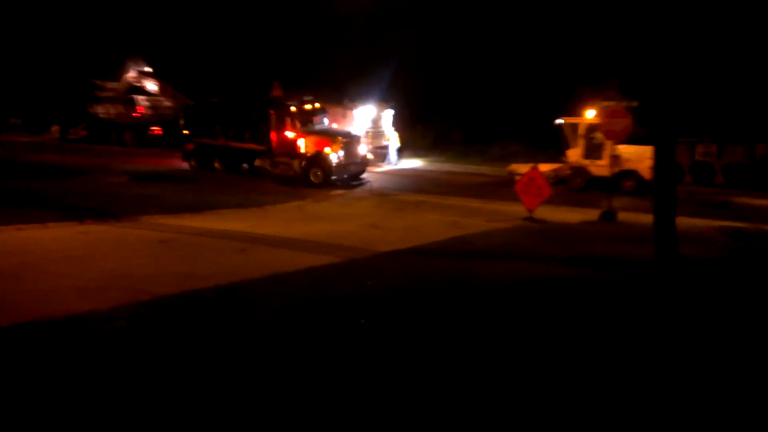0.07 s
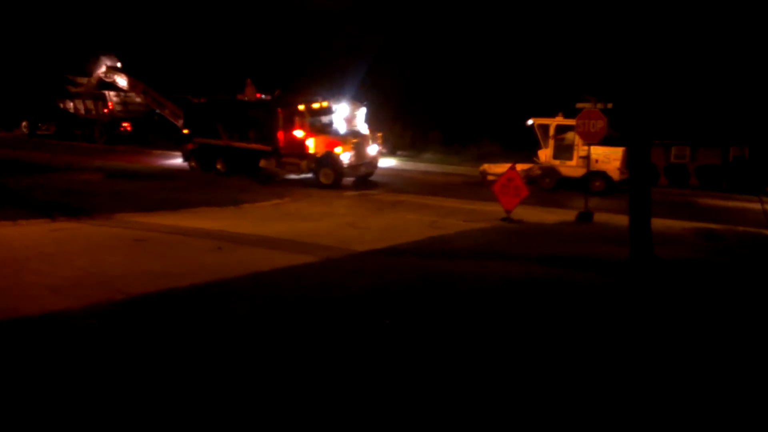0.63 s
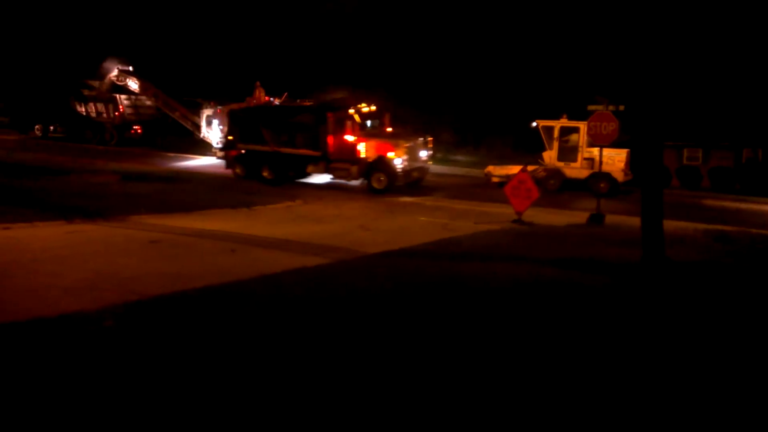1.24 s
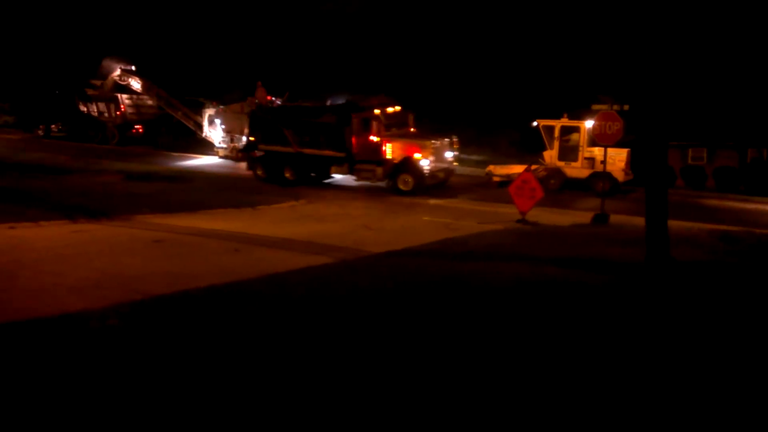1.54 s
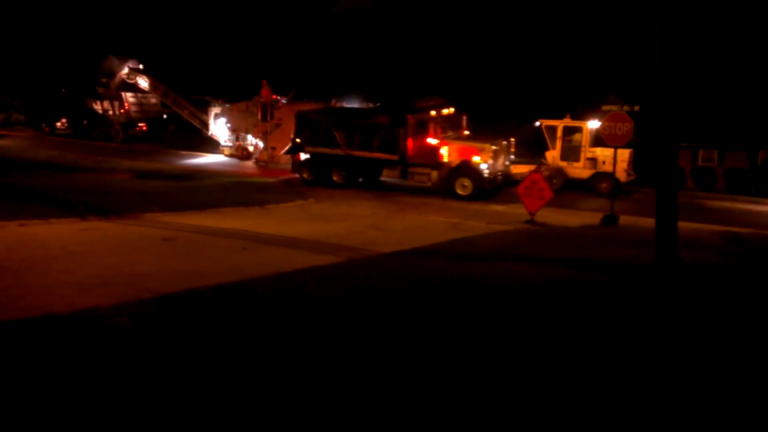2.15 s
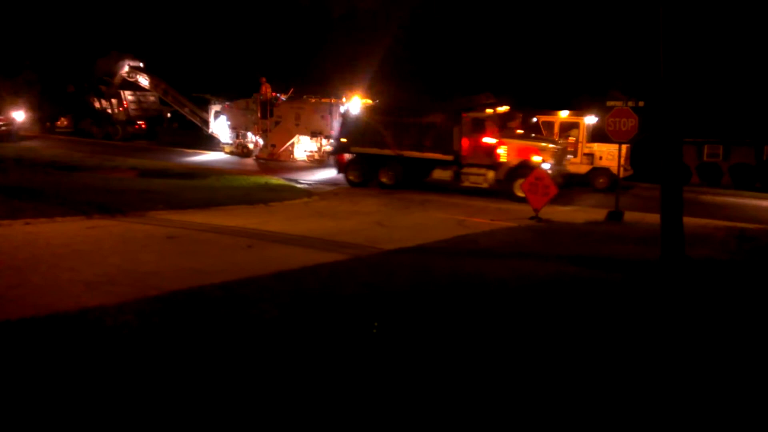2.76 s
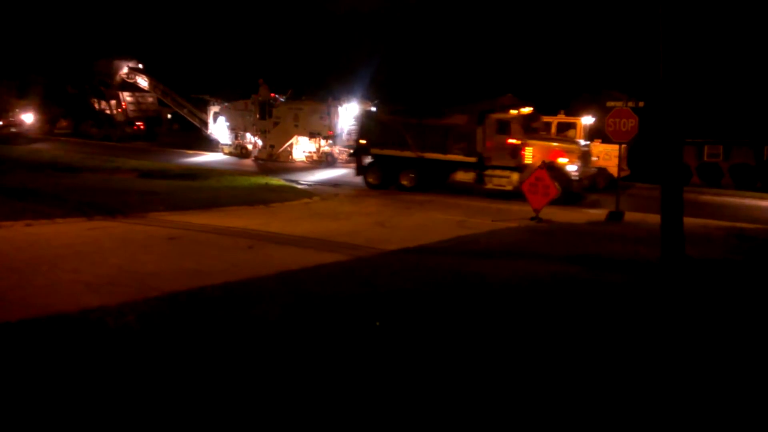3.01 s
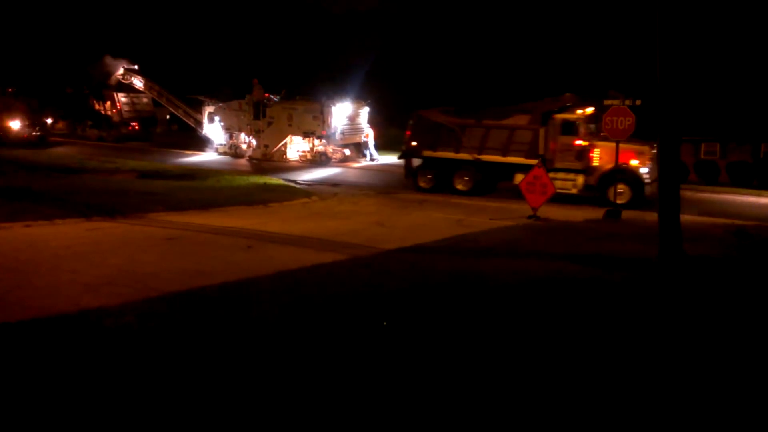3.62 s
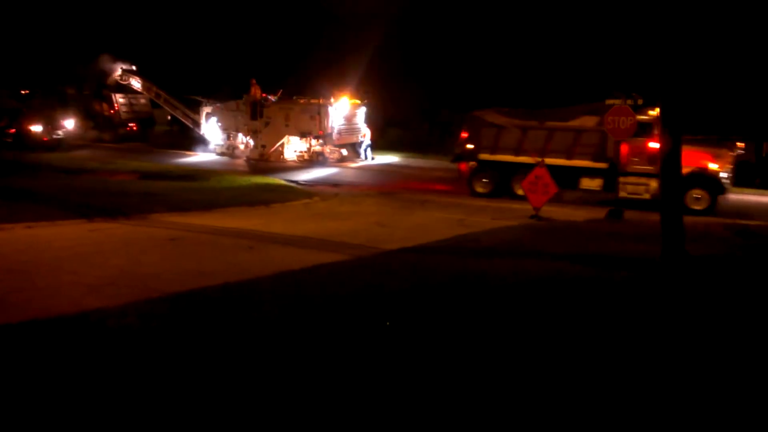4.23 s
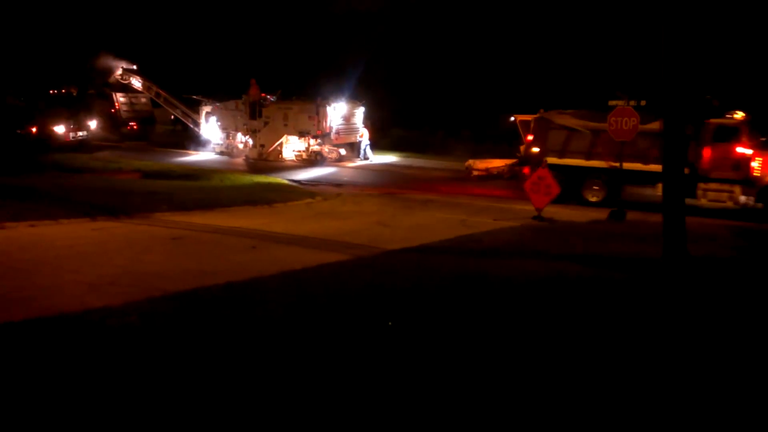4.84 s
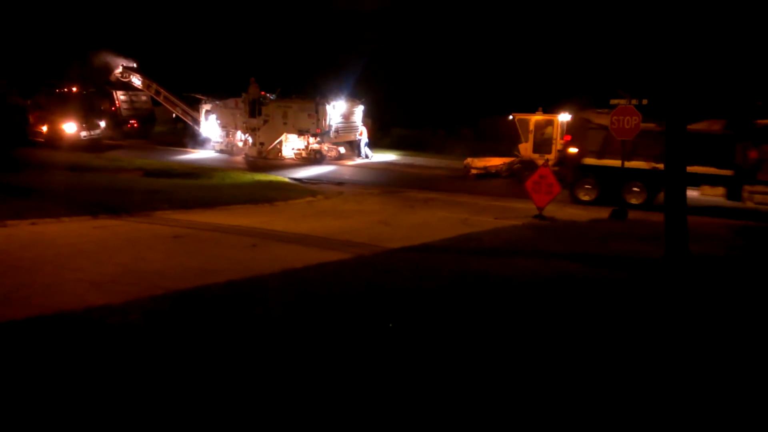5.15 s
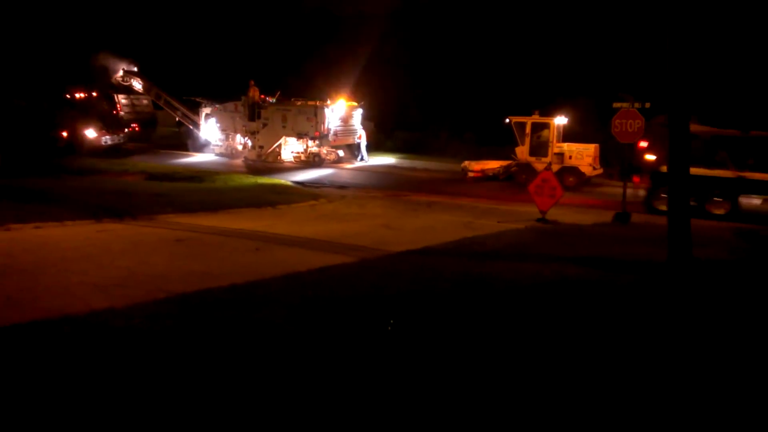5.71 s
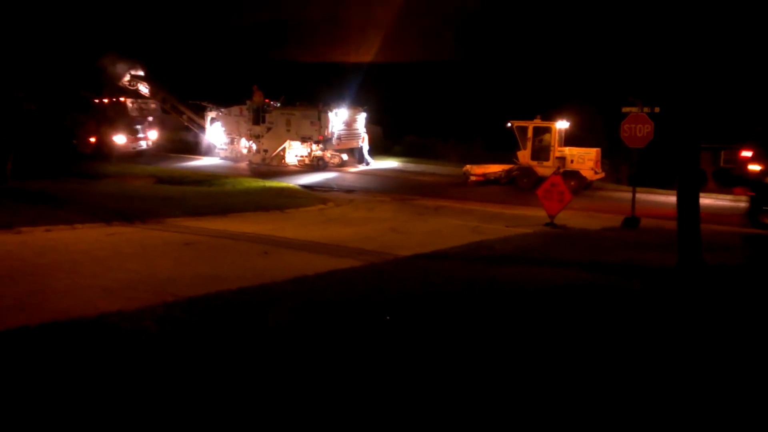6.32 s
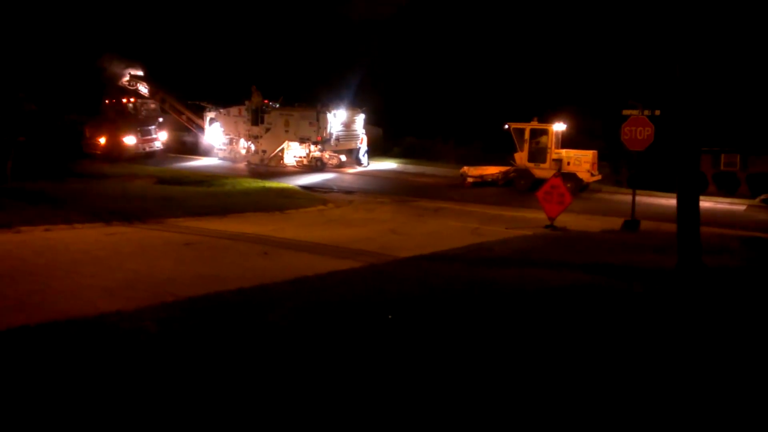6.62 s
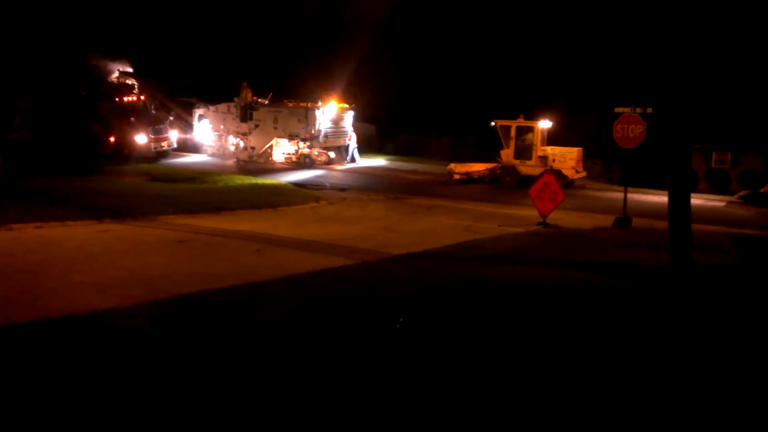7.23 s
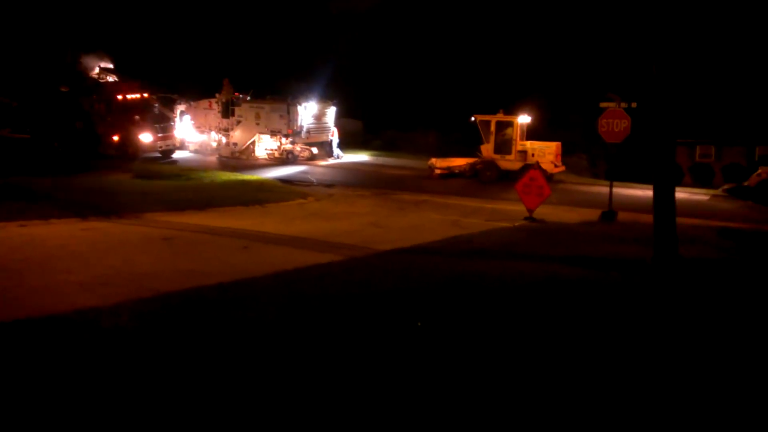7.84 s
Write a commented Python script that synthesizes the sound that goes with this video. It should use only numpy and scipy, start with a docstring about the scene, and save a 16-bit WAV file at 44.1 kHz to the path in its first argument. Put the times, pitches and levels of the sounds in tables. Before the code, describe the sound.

A road milling machine runs steadily at outdoor roadworks, heard from across a lawn. Its diesel throbs under a soft hydraulic whine and fan hum, while its drum grinds asphalt with a roar and gritty hiss. A dump truck gathers speed and passes midway, exhaust booming and tyres rumbling, briefly softening the machine's whine. Short, high squeals and scrapes come from the steel tracks throughout.

```python
"""A milling machine drones at night roadworks, heard across a lawn.
Its governed diesel throbs, its hydraulics and fan whine, and its drum grinds asphalt with a hiss.
The picks ring the drum housing; the steel tracks squeal and scrape.
A dump truck gathers speed and drives past, exhaust booming, hiding the machine for a while."""
import sys
import numpy as np
from scipy import signal
from scipy.fft import rfft, irfft, next_fast_len
from scipy.io import wavfile

SR = 44100
rng = np.random.default_rng(int(sys.argv[2]) if len(sys.argv) > 2 else 0)


def master(y):
    """Save y as 16-bit WAV."""
    cut = np.clip(np.atleast_2d(y).T, -1, 1)
    pcm = np.round(cut * 32767)  # scale
    wavfile.write(sys.argv[1], SR, pcm.astype(np.int16))


N = 355887
TIME = np.arange(N) / SR
BINS_HZ = np.maximum(np.fft.rfftfreq(next_fast_len(N, True), 1 / SR), 1)


def from_db(db):
    """Decibels to gain."""
    return 10 ** (np.asarray(db) / 20)


def unit_rms(x):
    """Scale to rms 1."""
    return x / np.sqrt(np.mean(x ** 2) + 1e-20)


def in_time(rows):
    """Each column of a curve, sample by sample."""
    times_s, *columns = np.transpose(rows)
    return [np.interp(TIME, times_s, column) for column in columns]


def at_hz(spectrum, hz):
    """Read a spectrum on a log-frequency axis."""
    points_hz, db = np.transpose(spectrum)
    return np.interp(np.log(hz), np.log(points_hz), db)


def drift(rate_hz):
    """Smooth random motion at about rate_hz; rms 1."""
    hop, settle = 40, 2000
    pole = np.exp(-2 * np.pi * hop * rate_hz / SR)
    white = rng.standard_normal(N // hop + settle + 2)
    slow = signal.lfilter([1], [1, -2 * pole, pole * pole], white)[settle:]
    return np.interp(np.arange(N) / hop, np.arange(len(slow)), unit_rms(slow))


def waver(depth_db, rate_hz):
    """A gain that wanders by depth_db rms."""
    return from_db(depth_db * drift(rate_hz))


def onset(at_s, fade_s):
    """Smooth step from 0 to 1, half way at at_s."""
    return 0.5 + 0.5 * np.sin(np.pi * np.clip((TIME - at_s) / fade_s, -0.5, 0.5))


def gate(start_s, end_s, edge_s):
    """Rise, hold and fall, 0-1."""
    return onset(start_s, edge_s) * (1 - onset(end_s, edge_s))


def swells(rows, edge_s):
    """Summed gain of gated events."""
    return sum(from_db(db) * gate(start_s, end_s, edge_s) for start_s, end_s, db in rows)


def screened():
    """How far the passing truck hides the machine, 0-1."""
    return gate(0.43, 3.77, edge_s=1)


def dip():
    """Gain of a brief sag in the low boom."""
    return from_db(-6 * gate(6.97, 7.11, edge_s=0.07))


def turning(hz):
    """Running phase in radians."""
    return 2 * np.pi * np.cumsum(hz) / SR


# Stereo width. Each row: frequency in Hz, side gain in dB.
WIDTH = [(40, -22), (100, -36.5), (290, -28.5), (430, -22), (640, -16), (900, -13), (1420, -7), (2100, -6),
         (3120, -12.5), (4640, -6), (6880, -4), (10200, -7)]
# Stereo balance. Each row: frequency in Hz, left minus right in dB.
LEAN = [(100, 0.5), (280, 0), (430, 5.5), (640, -4.5), (850, -3), (1080, 3), (1500, -1), (2500, 0),
        (4000, -3.5), (5100, -4), (5700, 2), (6400, 5.5), (7500, 3), (8600, 0)]

def placed(mid, side, hz):
    """Left and right: scattered sound grows with frequency, and some bands lean to one side."""
    side = side * from_db(at_hz(WIDTH, hz))
    lean = from_db(at_hz(LEAN, hz) / 2)
    return np.array([(mid + side) * lean, (mid - side) / lean])


def noise(spectrum):
    """Coloured stereo noise; its mid has rms 1."""
    white = rng.standard_normal((2, next_fast_len(N, True)))
    mid, side = rfft(white) * from_db(at_hz(spectrum, BINS_HZ))
    stereo = irfft(placed(mid, side, BINS_HZ))[:, :N]
    return stereo / np.std(stereo.mean(axis=0))


def ringing(modes):
    """Resonances kept sounding by countless small blows, as peaked noise."""
    response = sum(from_db(db) / (1 + ((BINS_HZ - hz) / width_hz) ** 2) for hz, width_hz, db in modes)
    return noise(np.column_stack([BINS_HZ, 20 * np.log10(response)]))


def tones(phase, base_hz, orders, scatter, scatter_hz):
    """Shaft harmonics; uneven strokes and moving air make each waver on its own."""
    out = np.zeros((2, N))
    for order, db in orders:
        angle = order * phase + rng.uniform(0, 2 * np.pi)
        cos, sin = np.cos(angle), np.sin(angle)
        mid = (1 + scatter * drift(scatter_hz)) * cos + scatter * drift(scatter_hz) * sin
        mid /= np.sqrt(1 + 2 * scatter ** 2)
        side = sin * drift(0.83)
        out += np.sqrt(2) * from_db(db) * placed(mid, side, order * base_hz)
    return out


CYCLE_HZ = 15.88
# Diesel harmonics. Each row: multiple of the cycle rate, relative level in dB.
DIESEL_ORDERS = [(5, -62), (6, -41.5), (7, -41.5), (8, -37), (9, -38), (10, -41), (11, -41.5), (12, -28.5),
                 (13, -35), (14, -34), (16, -34), (18, -42.5), (22, -45), (24, -47.5), (26, -44.5),
                 (28, -47), (30, -69)]

def diesel(cycle):
    """The machine's diesel fires six times a cycle and slowly comes clear of the truck."""
    hidden = 1 - onset(3.5, fade_s=0.83)
    firing = tones(cycle, CYCLE_HZ, DIESEL_ORDERS, scatter=0.4, scatter_hz=5.6)
    return firing * dip() * from_db(-2 - 5.5 * hidden)


# Pump harmonics. Each row: multiple of the pump rate, relative level in dB.
PUMP_ORDERS = [(1, -52), (2, -41), (6, -58), (12, -72)]

def pump(hz=146.7):
    """The hydraulic pump whines, softer behind the truck."""
    phase = turning(hz * (1 + 0.002 * drift(1.2)))
    whine = tones(phase, hz, PUMP_ORDERS, scatter=0.17, scatter_hz=0.29)
    return whine * from_db(3 - 5 * screened())


# Fan harmonics. Each row: multiple of the blade rate, relative level in dB.
FAN_ORDERS = [(1, -54.5), (2, -47)]
# Fan speed and strength. Each row: time in seconds, blade rate in Hz, gain in dB.
FAN_CURVE = [(0, 351, -5), (0.2, 351, 3), (0.35, 351.6, -1), (0.5, 353, 8), (0.68, 351, -1),
             (1.0, 347, 9.5), (1.17, 350.6, 11), (1.45, 352, -7), (1.85, 353, 6), (2.35, 352.2, 6.5),
             (2.9, 349, 4.5), (3.5, 347.3, -1), (4.4, 350, 4), (8.07, 353, -9)]

def fan():
    """The cooling fan's blades hum, swelling and fading."""
    blade_hz, gain_db = in_time(FAN_CURVE)
    phase = turning(blade_hz * (1 + 0.002 * drift(3)))
    return tones(phase, blade_hz.mean(), FAN_ORDERS, scatter=0.25, scatter_hz=9) * from_db(gain_db)


# Machine exhaust spectrum. Each row: frequency in Hz, relative density in dB.
RUMBLE = [(20, -40), (45, -50), (72, -30), (92, -3.5), (108, -4.5), (125, -3.5), (150, 6.5), (175, 3),
          (205, -0.5), (245, 3.5), (280, -7.5), (350, -11.5), (600, -61)]

def exhaust_rumble(stroke):
    """The machine's exhaust puffs throb with each turn of the crank."""
    throb = waver(1.5, 4.2) * (1 + 0.42 * stroke)
    return from_db(-32.5 + screened()) * noise(RUMBLE) * throb * dip()


# Body spectrum. Each row: frequency in Hz, relative density in dB.
DRONE = [(180, -19), (280, 4.5), (340, 2), (440, 1), (500, -1), (560, -7.5), (700, -40), (1200, -42)]

def body_drone():
    """The machine's body shakes."""
    return from_db(-35.5) * noise(DRONE) * waver(2.7, 12.4)


# Drum spectrum. Each row: frequency in Hz, relative density in dB.
ROAR = [(450, -42), (590, -3.5), (690, 3), (780, 7), (890, 5.5), (1000, 2.5), (1090, 0), (1230, -4),
        (1430, -6), (1650, -7.5), (1770, -24.5), (1900, -13), (2400, -34), (4000, -56)]

def drum_roar():
    """The drum grinds into the asphalt."""
    return from_db(-33.5) * noise(ROAR) * waver(1.2, 20)


def chips(per_s=2500, pitches=10, size_db=2.5, clump_db=5):
    """Asphalt chips tick against steel in clumps, each at its own place; rms 1."""
    out = np.zeros((2, N))
    for hz in np.geomspace(3930, 9230, pitches):
        hits = rng.random(N) < per_s / pitches * waver(clump_db, 8) / SR
        size = np.minimum(rng.exponential(1, N), 4)
        pan = rng.uniform(0, np.pi / 2, N)
        clicks = hits * from_db(size_db * size) * [np.cos(pan), np.sin(pan)]
        out += signal.lfilter(*signal.iirpeak(hz, Q=9, fs=SR), clicks + 1e-18)
    return unit_rms(out)


# Coarse and fine grit spectra. Each row: frequency in Hz, relative density in dB.
HISS = [(1200, -28), (2000, -3.5), (2430, -2), (2780, -2), (3050, 0), (3400, 0), (4050, 3), (4400, 2.5),
        (4850, 4.5), (5350, -0.5), (5750, 3), (6300, -0.5), (7500, -6), (10500, -24)]
SIZZLE = [(3500, -23), (5500, -8), (6150, -2.5), (6650, 7), (7400, 4), (7900, 5.5), (8500, 4.5), (9100, 6),
          (9550, 4), (9850, -6), (10100, 3), (10600, -6.5)]
# Fine grit strength. Each row: time in seconds, relative level in dB.
SIZZLE_LEVEL = [(0.0, -43.5), (0.33, -42.5), (0.6, -45), (1.05, -51), (1.3, -40), (1.78, -38.5),
                (1.87, -48.5), (2.1, -50.5), (2.8, -44), (2.9, -41), (3.7, -39.5), (4.45, -40.5),
                (4.7, -39), (6.7, -38.0), (6.9, -42), (7.1, -38.5), (7.3, -42.5), (8.07, -39)]

def grit_spray(stroke):
    """Thrown grit hisses and sizzles; the picks bite unevenly and shake the whole spray."""
    sizzle_db, = in_time(SIZZLE_LEVEL)
    swing_db = sizzle_db - sizzle_db.mean()
    bite = waver(1.0, 6.7) * (1 + 0.058 * stroke)
    hiss = from_db(-37 + 0.041 * swing_db) * noise(HISS)
    sizzle = from_db(sizzle_db + 1.5) * (noise(SIZZLE) + from_db(-4.5) * chips())
    return (hiss + sizzle) * bite


# Reflections off steel and road. Each row: delay in ms, gain in dB.
REFLECTIONS = [(0.901, -12.5), (1.7, -11.5), (3.1, -14)]

def reflected(direct, travel_ms=0.12, skew_ms=0.07):
    """The machine creeps along, so its reflections shift and ripple the sound."""
    out = direct.copy()
    for delay_ms, db in REFLECTIONS:
        path_ms = delay_ms + travel_ms * drift(0.14)
        for channel, extra_ms in enumerate([skew_ms, -skew_ms]):
            sent_s = TIME - (path_ms + extra_ms) / 1000
            out[channel] += from_db(db) * np.interp(sent_s, TIME, direct[channel], left=0)
    return out


# Drum housing resonances. Each row: frequency in Hz, half-width in Hz, relative density in dB.
HOUSING_MODES = [(772, 41, 5), (888.4, 26, 13.5), (1010, 45, -7), (1153, 56, -23)]
# Housing surges. Each row: start in seconds, end in seconds, level in dB.
HOUSING_SURGES = [(1.22, 1.37, -34), (2.0, 2.2, -43), (2.62, 2.8, -36.5), (2.95, 3.36, -33.5),
                  (5.85, 6.3, -48), (6.3, 6.56, -37), (6.76, 7.22, -38), (7.34, 7.46, -39),
                  (7.53, 7.88, -41)]

def drum_housing(bend_share=0.01097, bend_hz=3.99):
    """The picks ring the housing in surges; the changing load bends its pitch."""
    warped_s = TIME + bend_share * np.cumsum(drift(bend_hz)) / SR
    ring = ringing(HOUSING_MODES)
    bent = np.array([np.interp(warped_s, TIME, channel, period=N / SR) for channel in ring])
    gain = from_db(-37.5 - 9 * screened()) + swells(HOUSING_SURGES, edge_s=0.079)
    return gain * waver(0.81, 17) * bent


# Running gear resonances. Each row: frequency in Hz, half-width in Hz, relative density in dB.
GEAR_MODES = [(1616, 63, 1), (1755, 45, 3), (2120, 58, -3), (2320, 30, -3.5), (2455, 36, 0.5),
              (3454, 88, 0), (9130, 80, -6.5)]
# Gear rattles. Each row: start in seconds, end in seconds, level in dB.
GEAR_RATTLES = [(2.58, 2.97, -50), (3.34, 3.5, -59), (6.2, 6.4, -56), (7.52, 8.07, -47)]

def running_gear():
    """The steel running gear rings and rattles, louder once out from behind the truck."""
    hidden = 1 - onset(2.17, fade_s=0.24)
    gain = from_db(-45.75 - 4.5 * hidden) + swells(GEAR_RATTLES, edge_s=0.039)
    return gain * waver(2.7, 6.8) * ringing(GEAR_MODES)


# Truck cylinders in firing order. Each entry: relative strength in dB.
CYLINDERS_DB = [7, -15, -12, -1, -11, -16.5]

def exhaust_puffs(crank, uneven_db=2.0, pipe_hz=(137, 257)):
    """Each firing sends a puff down the truck's pipe; unequal cylinders make it chug. Rms 1."""
    firing = np.floor(crank / (4 * np.pi) * len(CYLINDERS_DB)).astype(int)
    at = np.flatnonzero(np.diff(firing))
    cylinder_db = np.array(CYLINDERS_DB)[firing[at] % len(CYLINDERS_DB)]
    size, polarity = rng.standard_normal((2, len(at)))
    clicks = np.zeros(N)
    clicks[at] = np.sign(polarity) * from_db(cylinder_db + uneven_db * size)
    pipe = signal.butter(4, pipe_hz, "band", fs=SR, output="sos")
    return unit_rms(signal.sosfilt(pipe, clicks))


# Truck exhaust harmonics. Each row: multiple of the crank rate, relative level in dB.
TRUCK_ORDERS = [(3, -21.5), (4, -12), (5, -12), (6, -0.5), (7, -16), (9, -30), (12, -22.5)]
# Engine speed, rising then dropping for the next gear. Each row: time in seconds, crank rate in Hz.
TRUCK_SPEED = [(0, 30), (2.3, 29), (2.7, 31.2), (3.95, 32.2), (4.75, 34.3), (5.2, 36.3), (5.85, 37.3),
               (6.55, 36.4), (7.15, 31.5), (8.07, 31.2)]
# Throttle openings. Each row: start in seconds, end in seconds, gain in dB.
TRUCK_PULLS = [(0, .55, -31.5), (2.45, 3.15, -31), (3.15, 4.0, -28), (4.0, 4.6, -30.5), (4.6, 5.3, -33.5),
               (5.3, 5.95, -29.5), (6.6, 6.95, -36), (7.12, 7.55, -33), (7.55, 8.07, -38)]

def truck_exhaust(coast_db=-50):
    """The truck's exhaust booms and chugs under throttle, lurching once every two crank turns."""
    crank_hz, = in_time(TRUCK_SPEED)
    crank = turning(crank_hz * (1 + 0.003 * drift(5)))
    throttle = from_db(coast_db) + swells(TRUCK_PULLS, edge_s=0.11)
    boom = tones(crank, crank_hz.mean(), TRUCK_ORDERS, scatter=0.3, scatter_hz=7)
    lurch = 1 + 0.27 * np.cos(crank / 2)
    chug = from_db(-5) * exhaust_puffs(crank)
    return throttle * dip() * (boom * lurch + chug)


# Tyre and frame spectra. Each row: frequency in Hz, relative density in dB.
TYRES = [(300, -16), (520, -7.5), (670, 6.5), (760, 9.5), (900, 2), (1020, 0.5), (1300, -16), (2200, -39)]
FRAME = [(55, -29), (75, -15), (92, 3.5), (115, 5.5), (145, -1.5), (220, -31)]

def truck_rolling():
    """Tyres and gears roar, frame and empty bed rumble; both swell as the truck comes closest."""
    def nearness(peak_s, distance_over_speed_s):
        return 1 / np.hypot(1, (TIME - peak_s) / distance_over_speed_s)
    tyres = from_db(-36.5) * noise(TYRES) * waver(0.73, 8.6) * nearness(3.85, 0.44)
    frame = from_db(-38.5) * noise(FRAME) * nearness(3.8, 0.72)
    return tyres + frame


# Track squeals. Each row: start in seconds, length in seconds, first and last pitch in Hz,
# level before echoes in dB, pitch jitter in Hz.
SQUEALS = [(0.418, 0.077, 6650, 6820, -44, 40), (1.263, 0.19, 7020, 7160, -43, 23),
           (1.425, 0.068, 4820, 4980, -41, 20), (1.486, 0.037, 4990, 5080, -36.5, 30),
           (1.522, .03, 5220, 5280, -38, 40), (1.54, .12, 5130, 4920, -37.5, 85),
           (1.665, 0.1, 4380, 4200, -41, 130), (1.752, 0.043, 3950, 3600, -40, 170),
           (3.33, .07, 10100, 10000, -46, 70), (4.058, 0.036, 4800, 4740, -36, 20),
           (4.081, 0.038, 4800, 4770, -27.5, 15), (4.112, .04, 4780, 4800, -33, 15),
           (4.163, 0.051, 4750, 4860, -33, 28), (4.245, 0.057, 4880, 4900, -33.5, 21),
           (4.31, 0.034, 5180, 5080, -33, 35), (4.68, 0.066, 9920, 9970, -40, 56),
           (4.843, 0.15, 9800, 9800, -45, 88), (5.048, 0.1, 9820, 9900, -36.5, 35),
           (5.068, 0.059, 6680, 6580, -31, 24), (5.132, 0.1, 6680, 6400, -40.5, 90),
           (5.23, 0.15, 5420, 5350, -35.5, 38), (5.35, 0.07, 5130, 5180, -32.5, 55),
           (5.41, 0.09, 5000, 4780, -36, 140), (5.88, 0.2, 4770, 4740, -42, 30),
           (6.383, .05, 6030, 5980, -39, 70), (6.43, 0.07, 5920, 5780, -44, 170),
           (6.525, .05, 5240, 5100, -38.5, 110), (6.59, 0.07, 4940, 4760, -41, 220),
           (6.655, 0.08, 5050, 5330, -40.5, 210), (6.745, 0.05, 4700, 5000, -39, 220),
           (6.646, .095, 9730, 9810, -40, 35), (7.717, 0.23, 9660, 9800, -47, 99)]

def track_squeals(edge_s=0.013, echo_db=2.5, echo_t60_s=0.085):
    """Dry track pins stick and slip in rasping glides, with short echoes from ground and steel."""
    direct = np.zeros(N)
    slip, grip = drift(160), waver(2.0, 110)
    for start_s, length_s, first_hz, last_hz, db, rasp_hz in SQUEALS:
        on = (TIME >= start_s) & (TIME < start_s + length_s)
        t = TIME[on] - start_s
        swell = np.sin(np.pi / 2 * np.clip(np.minimum(t, length_s - t) / edge_s, 0, 1))
        hz = first_hz + (last_hz - first_hz) * t / length_s + rasp_hz * slip[on]
        direct[on] += from_db(db) * swell * grip[on] * np.sin(turning(hz))
    echo = rng.standard_normal((2, SR // 4)) * from_db(-60 * TIME[:SR // 4] / echo_t60_s)
    echo /= np.linalg.norm(echo, axis=1, keepdims=True)
    return direct + from_db(echo_db) * signal.fftconvolve(direct[None], echo, axes=1)[:, :N]


# Street rumble spectrum. Each row: frequency in Hz, relative density in dB.
WASH = [(30, -21), (55, -12), (90, -1.5), (140, 2.5), (200, 2), (300, 2), (450, 3), (600, 5.5), (900, -17),
        (1500, -21)]

def street_wash():
    """Rumble returning from all round the street reaches the two ears out of step."""
    return from_db(-44) * onset(1.27, fade_s=0.44) * noise(WASH).mean(axis=0) * [[1], [-1]]


# Scrape spectrum. Each row: frequency in Hz, relative density in dB.
SCRAPE_SPECTRUM = [(1500, 3), (2800, -6), (3700, 2), (4400, 1), (5100, 1), (6000, -4), (9000, -30)]
# Track scrapes. Each row: start in seconds, end in seconds, level in dB.
SCRAPES = [(1.55, 1.81, -39), (2.98, 3.1, -44), (4.95, 5.06, -38), (6.22, 6.4, -39.5), (6.4, 6.8, -49),
           (7.97, 8.07, -36)]

def track_scrapes():
    """Steel drags over grit in rough, pitchless bursts."""
    return swells(SCRAPES, edge_s=0.05) * noise(SCRAPE_SPECTRUM) * waver(2.5, 45)


# Body panel resonances. Each row: frequency in Hz, half-width in Hz, relative density in dB.
PANEL_MODES = [(369, 14, 0.5), (435, 22, -1.5)]
# Panel growls. Each row: start in seconds, end in seconds, level in dB.
GROWLS = [(1.68, 1.88, -31.5), (1.88, 2.15, -40), (2.15, 2.4, -33.5), (2.55, 2.97, -35), (3.1, 3.3, -38),
          (5.2, 5.7, -40), (6.8, 7.52, -40)]

def panel_growls():
    """The machine's panels resonate in short growls."""
    return swells(GROWLS, edge_s=0.015) * ringing(PANEL_MODES)


def scene():
    """The machine mills, its diesel held nearly steady by the governor, while the truck passes."""
    cycle = turning(CYCLE_HZ * (1 + 0.002 * drift(0.8)))
    stroke = np.cos(2 * cycle)   # two crank turns a cycle
    engine = diesel(cycle) + pump() + fan() + exhaust_rumble(stroke) + body_drone()
    milling = reflected(drum_roar() + grit_spray(stroke)) + drum_housing() + running_gear()
    truck = truck_exhaust() + truck_rolling()
    return engine + milling + truck + track_squeals() + street_wash() + track_scrapes() + panel_growls()


def record(dry):
    """A steep low-pass cuts the top."""
    cutoff_hz = 10500
    return signal.sosfilt(signal.ellip(14, 0.1, 80, cutoff_hz, fs=SR, output="sos"), dry)


dry = scene()
out = record(dry)
master(out)
```